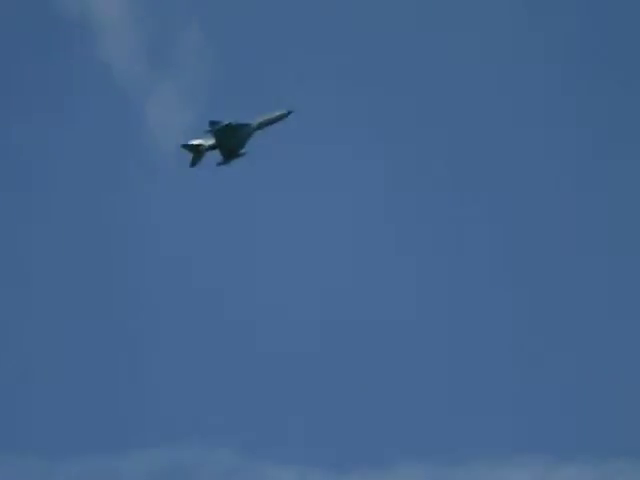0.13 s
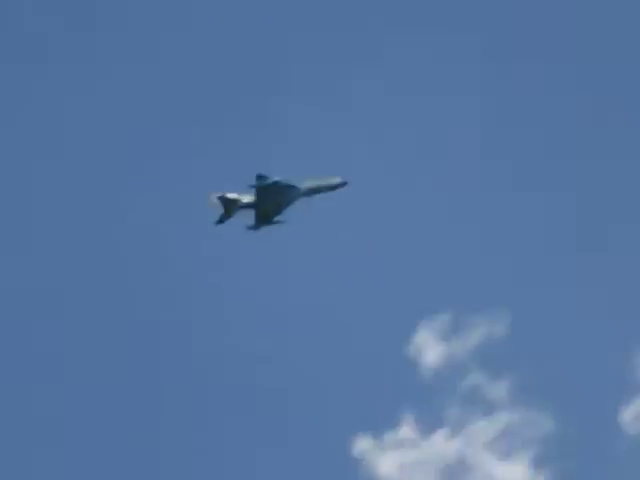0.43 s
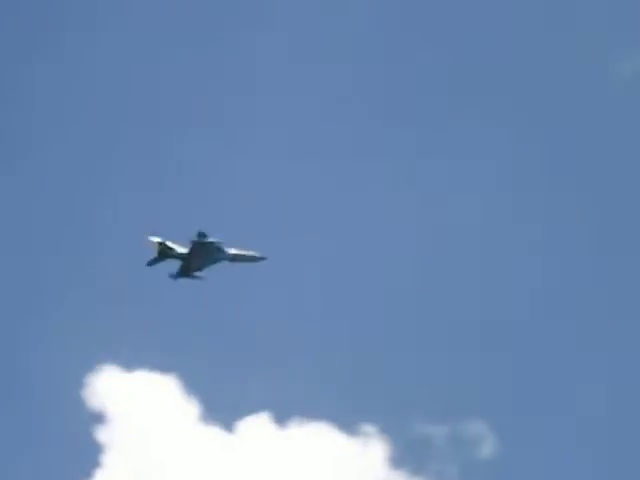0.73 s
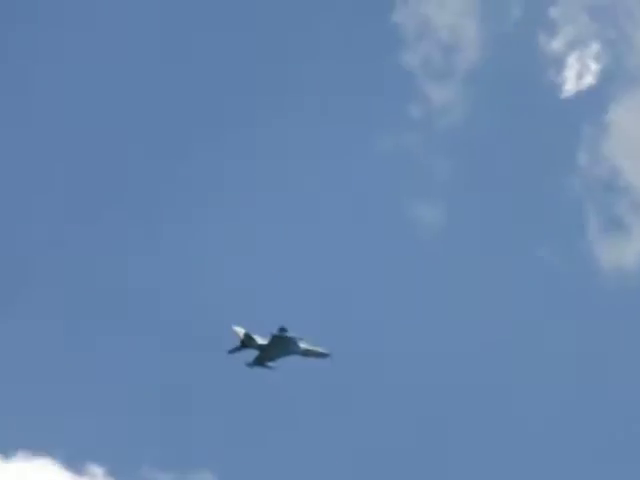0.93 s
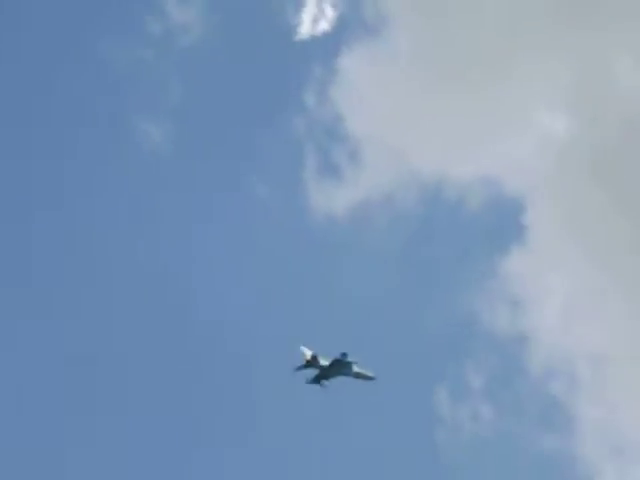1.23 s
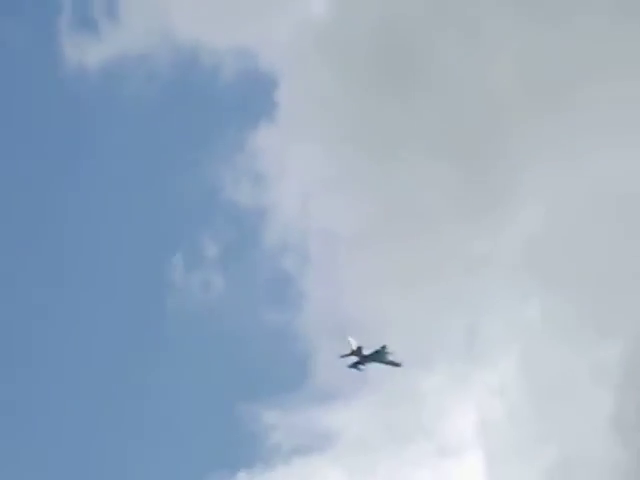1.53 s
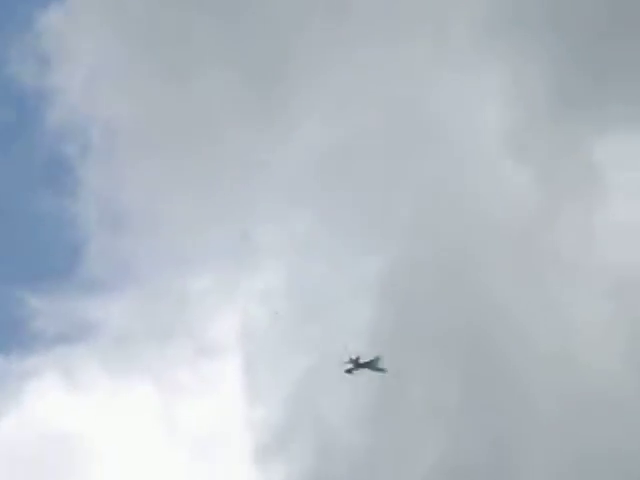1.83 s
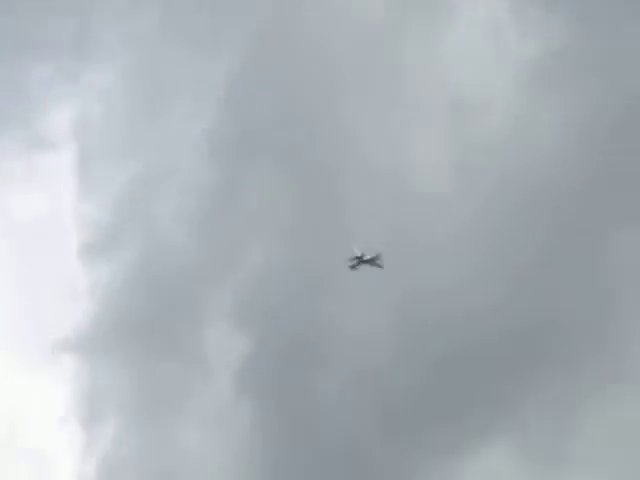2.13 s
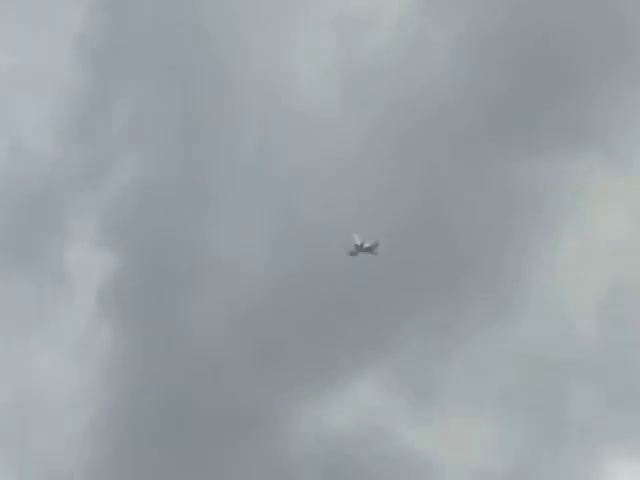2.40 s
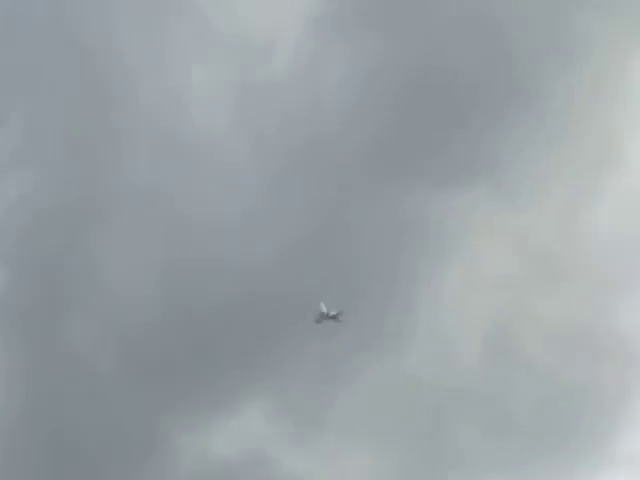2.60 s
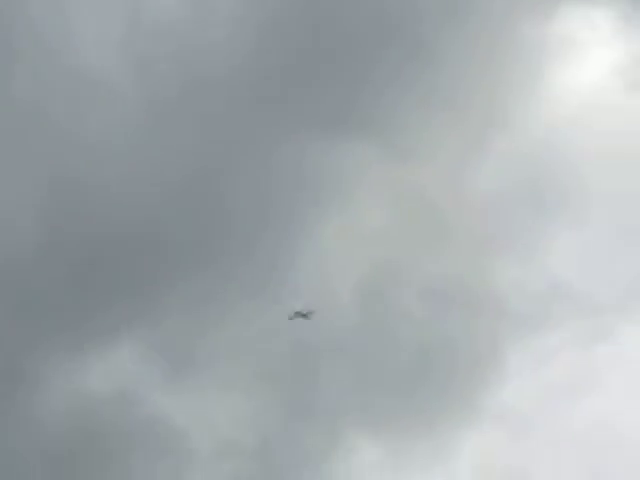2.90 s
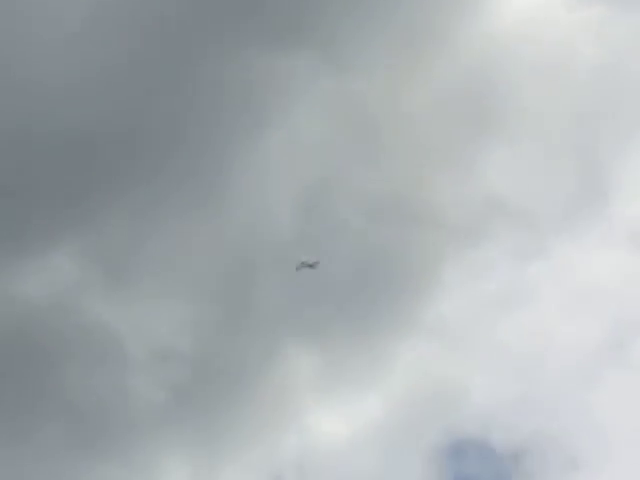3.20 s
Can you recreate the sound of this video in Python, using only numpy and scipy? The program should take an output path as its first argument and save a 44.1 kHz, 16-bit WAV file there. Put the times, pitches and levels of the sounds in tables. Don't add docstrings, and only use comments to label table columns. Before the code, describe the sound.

Loud jet engine noise under open sky: fluttering bright hiss and howl, abrupt surges around two seconds, heavy rumbling roar, then falling away amid low wind thumps; narrow, overloaded handheld microphone with ringing upper mids.

```python
import sys
import numpy as np
from scipy import signal
from scipy.fft import rfft, irfft, next_fast_len
from scipy.io import wavfile
from scipy.ndimage import uniform_filter1d, map_coordinates

SR = 44100
rng = np.random.default_rng(int(sys.argv[2]) if len(sys.argv) > 2 else 0)


def field_ratio(decibels):
    return 10 ** (np.asarray(decibels, dtype=float) / 20)


def generate_wav(signal):
    frames = np.transpose(np.atleast_2d(signal))
    scaled = np.clip(frames, -1, 1) * 32767
    pcm = np.round(scaled).astype(np.int16)
    wavfile.write(sys.argv[1], SR, pcm)


N = 147735


def unit(x):
    return x / np.sqrt(np.mean(x ** 2) + 1e-20)


def clock():
    return np.arange(N) / SR


def along(points, hz):
    point_hz, value = np.transpose(points)
    return np.interp(np.log(hz + 1), np.log(point_hz + 1), value)


def filtered(x, response):
    size = next_fast_len(N + SR // 2)
    return irfft(rfft(x, size) * response(np.fft.rfftfreq(size, 1 / SR)), size)[..., :N]


def shaped(x, points_db):
    return filtered(x, lambda hz: field_ratio(along(points_db, hz)))


def high_pass(x, corner_hz):
    return filtered(x, lambda hz: 1j * hz / (corner_hz + 1j * hz))


def wobble(knots_per_s):
    knots = rng.standard_normal(int(N * knots_per_s / SR) + 4)
    return map_coordinates(knots, [clock() * knots_per_s])


def rush(spectrum, patchy_db):
    z = signal.stft(rng.standard_normal(N), nperseg=512)[2]
    patches = uniform_filter1d(rng.standard_normal(z.shape), size=6, axis=0)
    patches = uniform_filter1d(patches, size=9, axis=1)
    x = signal.istft(z * field_ratio(patchy_db * unit(patches)), nperseg=512)[1][:N]
    return unit(shaped(x, spectrum))


def bells(rows):
    t = clock()
    total_db = 0
    for s, db, rise_s, fall_s in rows:
        width_s = np.where(t < s, rise_s, fall_s)
        total_db = total_db + db * np.exp(-2 * ((t - s) / width_s) ** 2)
    return total_db


# (time [s], loudness [dB], exhaust turned to the listener [dB])
FLIGHT_PATH = [(0, -21.5, -10), (.2, -18.5, -10.5), (.45, -22, -10.5), (.62, -16.5, -19),
               (0.901, -15.5, -8.5), (1.152, -16.5, -17), (1.3, -19, -10.5), (1.5, -19.5, -3),
               (1.7, -19, -4), (1.949, -18.5, 3), (2.049, -19, 0), (2.201, -15.5, -0.5),
               (2.35, -14.5, -2.5), (2.6, -13.5, -1), (2.8, -14, -2.5), (2.95, -19.5, 2.5),
               (3.1, -25.5, 6.5), (3.35, -30, 7)]


def jet():
    s, *columns = np.transpose(FLIGHT_PATH)
    loud_db, aft_db = [np.interp(clock(), s, column) for column in columns]
    swell_db, surge_db = air_pockets(), surges()
    hiss = field_ratio(swell_db + surge_db - 4.5) * exhaust_hiss()
    layers = hiss + intake_howl(swell_db) + exhaust_roar(aft_db, swell_db, surge_db)
    return field_ratio(loud_db) * layers + big_shocks()


# (frequency [Hz], density [dB per Hz])
HISS_SPECTRUM = [(150, -61.5), (400, -15), (900, -0.5), (1800, 4), (2600, 5.5), (4200, -4.5), (5200, -13.5),
                 (7000, -29.5)]


def exhaust_hiss():
    rear_db = bells([(1.85, 11, 1.3, 1.5)])
    flutter_db = 0.59 * wobble(30.01) + 0.46 * wobble(120)
    hiss = field_ratio(flutter_db - 0.49 * rear_db) * rush(HISS_SPECTRUM, patchy_db=1.0)
    return hiss + field_ratio(-10 + rear_db) * crackle()


# (frequency [Hz], density [dB per Hz])
INTAKE_SPECTRUM = [(450, -35), (680, -9), (780, -2), (900, 0), (1020, -3), (1300, -11), (2000, -40)]


def intake_howl(swell_db):
    fade_s, loss_db, pocket_share = 0.5, 16, 0.7
    gone = 1 / (1 + np.exp(-(clock() - fade_s) / 0.02))
    level_db = -5 - loss_db * gone + pocket_share * swell_db + 2.2 * wobble(18)
    return field_ratio(level_db) * rush(INTAKE_SPECTRUM, patchy_db=1.4)


# (frequency [Hz], density [dB per Hz])
ROAR_SPECTRUM = [(25, -28.5), (60, -5.5), (120, 0), (300, -2.5), (500, -6.5), (900, -15), (1600, -17.5),
                 (3500, -49)]


def exhaust_roar(aft_db, swell_db, surge_db):
    reheat_s, reheat_db, reheat_fade_s = 2.0605, 6.5, 1
    surge_share, pocket_share = 0.62, 0.1
    t = clock()
    lit_db = reheat_db * (t > reheat_s) * np.exp(-((t - reheat_s) / reheat_fade_s) ** 4)
    level_db = aft_db + lit_db + surge_share * surge_db + pocket_share * swell_db
    return field_ratio(-0.5 + level_db + 1.1 * wobble(11)) * rush(ROAR_SPECTRUM, patchy_db=1.25)


def healed(fronts):
    heal_s = 0.00027
    return -signal.lfilter([1], [1, -np.exp(-1 / (heal_s * SR))], fronts)


def crackle():
    shocks_per_s, spread_db = 650, 4.5
    draw = rng.random((N, 2))
    struck = draw[:, 0] < shocks_per_s / SR
    size = field_ratio(-spread_db * np.log(draw[:, 1] + 0.1))
    return unit(high_pass(healed(struck * size), 150))


# (time [s], peak [dB])
SHOCK_PEAKS = [(0.8602, 1.5), (.960, -4.5), (1.4488, -6.5), (1.6423, 1.5), (1.921, 0.5), (1.934, -3),
               (2.305, 0), (2.316, 0), (2.447, 0), (2.469, 0), (2.7335, -1), (2.7765, 1.5), (2.790, -1),
               (2.8035, 2), (2.8175, 0), (2.8695, -4), (2.877, -5)]


def big_shocks():
    s, db = np.transpose(SHOCK_PEAKS)
    return healed(np.bincount(np.round(s * SR).astype(int), field_ratio(db), N))


# (time [s], level [dB], hold [s], release [s])
SHOCK_SURGES = [
    (1.8565, 21, .034, .024),
    (2.061, 18, .038, .018),
]


def surges():
    attack_s = 0.00072
    total_db = 0
    for s, db, hold_s, release_s in SHOCK_SURGES:
        corners_s = s + np.cumsum([-attack_s, attack_s, hold_s, release_s])
        total_db = total_db + np.interp(clock(), corners_s, [0, db, db, 0])
    return total_db


# (time [s], swell [dB], rise [s], fall [s])
AIR_POCKETS = [(.19, 2, 0.087, 0.014), (.33, 5.5, 0.089, 0.0054), (.365, -8, .015, 0.018),
               (.44, 7, 0.064, 0.031), (.54, 6.5, 0.041, 0.017), (.615, -9, 0.054, 0.14),
               (.705, 5.5, .01, 0.027), (.81, 2, 0.042, 0.013), (.965, 6.5, 0.0067, 0.024),
               (1.125, 5.5, 0.012, 0.0098), (1.2, 5.5, 0.0188, 0.068), (1.31, 2, 0.033, 0.028),
               (1.365, 5, 0.028, 0.02), (1.45, 5, 0.043, 0.012), (1.57, 2, .015, .02),
               (1.605, -9.5, 0.0073, 0.0073), (1.69, 3.5, 0.09, 0.18), (1.815, -4.5, 0.021, 0.021),
               (2.125, 6, 0.046, 0.11), (2.21, 5.5, .03, .05), (2.3, -7, 0.034, 0.12),
               (2.385, 11.5, 0.081, 0.034), (2.45, -7.5, 0.026, 0.021), (2.545, 4, .03, 0.051),
               (2.65, 10, 0.033, 0.031), (2.735, -8.5, 0.022, 0.018), (2.8, -4.5, 0.036, 0.043),
               (2.975, -5, 0.1, 0.035), (3.02, 0.5, 0.015, 0.036), (3.24, 12, 0.064, 0.075)]


def air_pockets():
    return bells(AIR_POCKETS)


# (frequency [Hz], reflected level [dB])
GROUND_REFLECTION = [(100, -6), (500, -7), (1000, -9), (3000, -21)]
# (time [s], delay [ms])
GROUND_DELAY = [(0, 6), (.2, 6.5), (.5, 8), (.8, 9.6), (1.1, 9.9), (1.4, 9.7), (2.0, 8.4), (2.6, 7.4),
                (3.35, 6.7)]


def ground(x):
    late_s = np.interp(clock(), *np.transpose(GROUND_DELAY)) / 1000
    soft = shaped(x, GROUND_REFLECTION)
    return map_coordinates(soft, [np.arange(N) - late_s * SR], order=3, mode="reflect")


# (frequency [Hz], density [dB per Hz])
RUMBLE_SPECTRUM = [(10, -9.5), (25, -3), (42, -0.5), (62, -5), (120, -48.5)]
# (time [s], swell [dB], rise [s], fall [s])
WIND_BUFFETS = [(.05, 16, .04, .1), (.28, 5, .05, .15), (1.65, 15, 0.024, 0.55), (1.87, 26, .02, .08),
                (2.075, 24.5, .02, 0.023), (2.15, 21.5, 0.045, 0.06), (2.32, 21.5, .1, 0.11),
                (2.45, 20.5, 0.1, .12), (2.78, 21, .2, 0.049), (2.93, 24, 0.14, .05),
                (3.06, 32, .05, 0.029), (3.17, 26, .04, 0.106), (3.35, 22, .06, .1)]


def wind():
    level_db = -45.5 + bells(WIND_BUFFETS) + 2.5 * wobble(8.2)
    return field_ratio(level_db) * rush(RUMBLE_SPECTRUM, patchy_db=2.3)


def scene():
    direct = jet()
    return (0.86 * (direct + ground(direct)) + wind())[None]


def microphone_port(x):
    ring_hz, width_hz, ring_db = 3255, 340, 13

    def response(hz):
        damping = 1j * hz * width_hz
        return 1 + field_ratio(ring_db) * damping / (ring_hz ** 2 - hz * hz + damping)
    return filtered(x, response)


# (frequency [Hz], gain [dB])
CONVERTER_INPUT = [(4600, 0), (5100, -1.5), (5350, -8), (5512, -14.5), (5800, -74.5)]
# (frequency [Hz], gain [dB])
CONVERTER_OUTPUT = [(5300, 0), (5700, -8.5), (5900, -16.5), (6200, -36.5), (6500, -92.5)]


def slow_converter(x):
    keep_every = 4
    x = shaped(x, CONVERTER_INPUT)
    kept = keep_every * x * (np.arange(N) % keep_every == 0)
    return shaped(kept, CONVERTER_OUTPUT)


def top_cut(x):
    return signal.sosfilt(signal.butter(12, 15760, fs=SR, output="sos"), x)


def record(dry):
    x = np.clip(microphone_port(dry), -0.7, 0.7)
    x = np.clip(slow_converter(x), -0.715, 0.715)
    mix = high_pass(x, 5)
    return top_cut(mix)


dry = scene()
out = record(dry)
generate_wav(out)
```